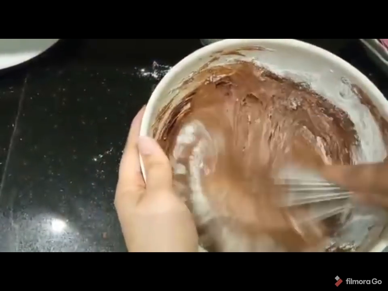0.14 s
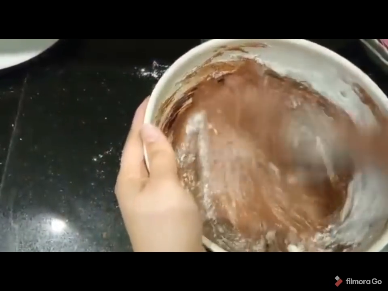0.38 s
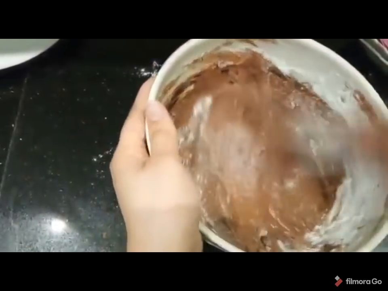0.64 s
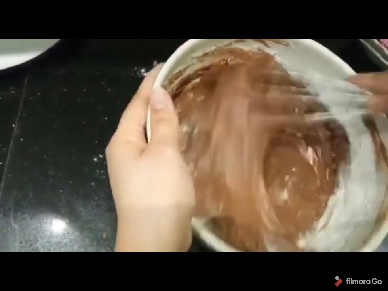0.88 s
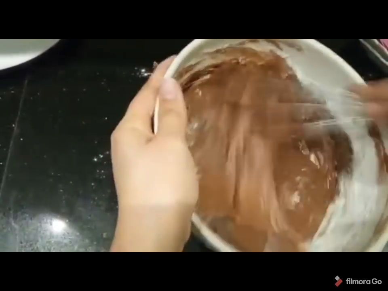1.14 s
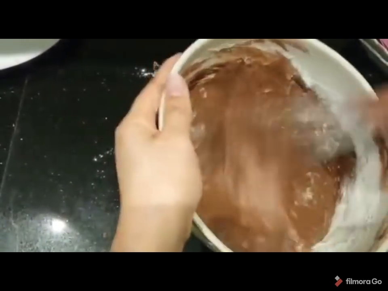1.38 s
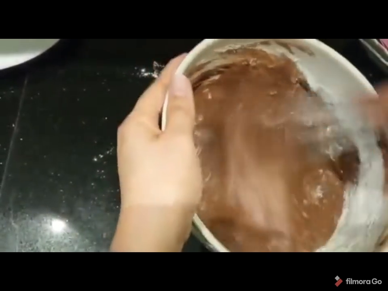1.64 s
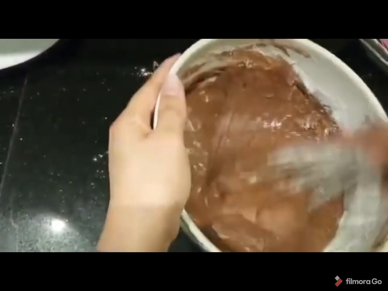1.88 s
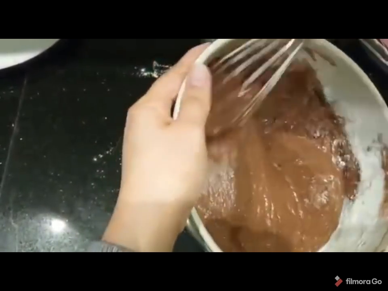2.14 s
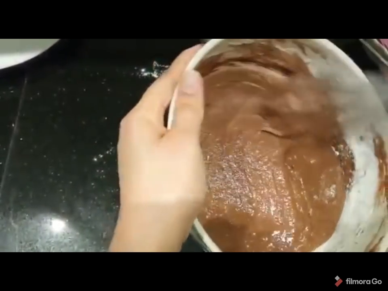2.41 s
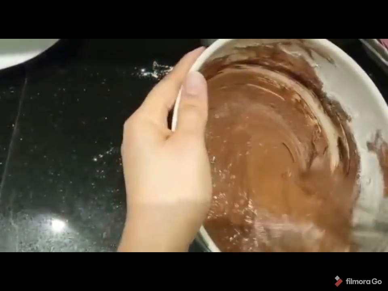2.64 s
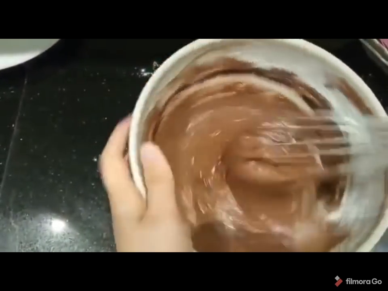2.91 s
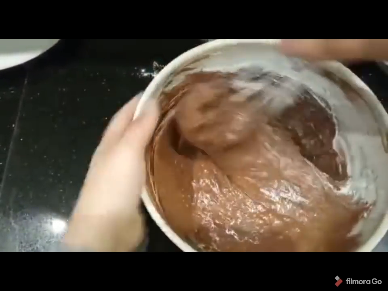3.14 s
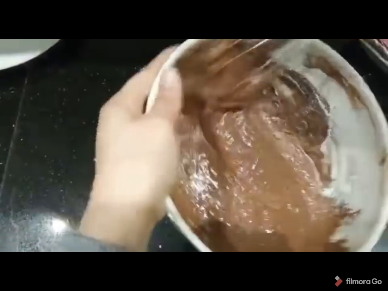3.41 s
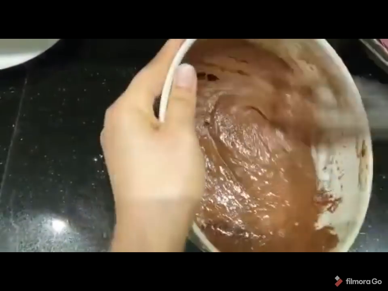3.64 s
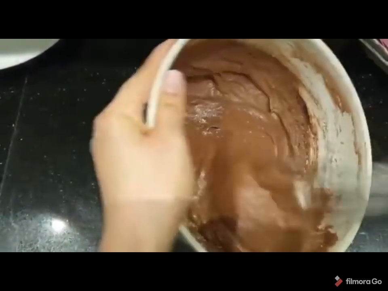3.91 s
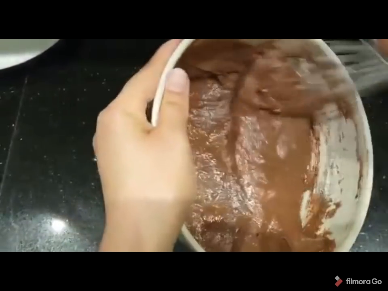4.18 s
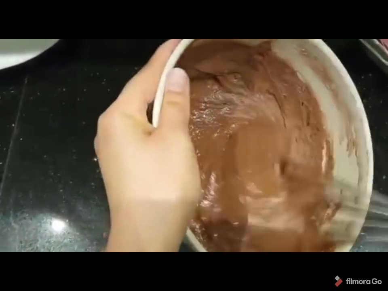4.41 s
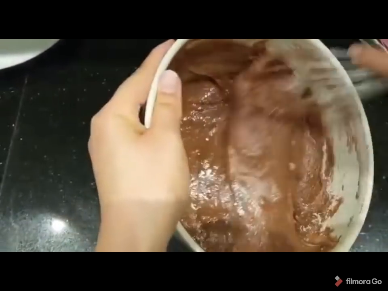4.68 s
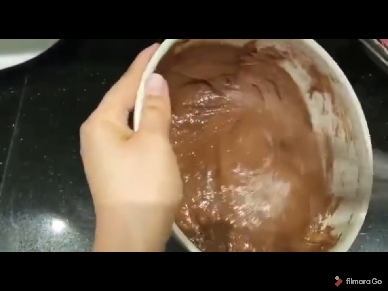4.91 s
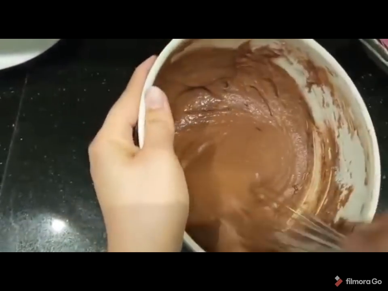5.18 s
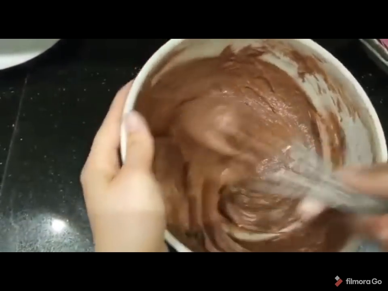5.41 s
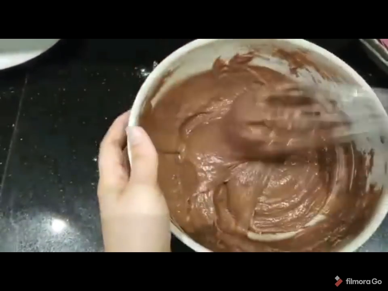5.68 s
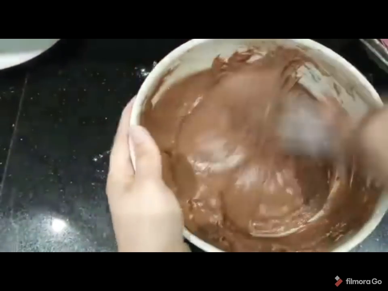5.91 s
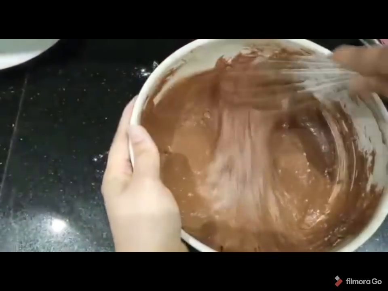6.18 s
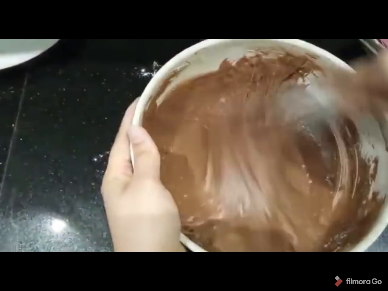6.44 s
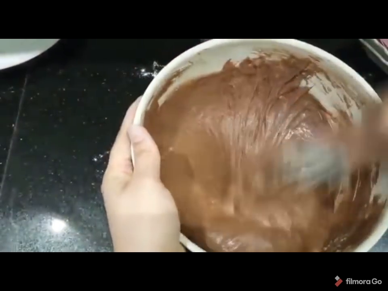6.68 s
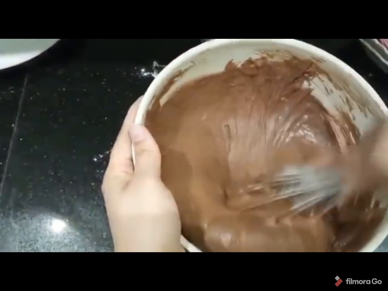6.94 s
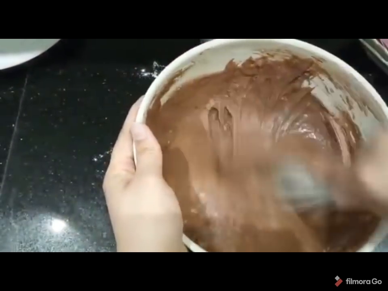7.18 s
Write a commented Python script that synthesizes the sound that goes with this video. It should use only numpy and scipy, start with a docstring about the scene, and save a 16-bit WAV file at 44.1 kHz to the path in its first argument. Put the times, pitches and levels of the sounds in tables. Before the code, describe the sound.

A phone close to the bowl catches steel wires tapping and dragging through batter, cushioned and irregular. After about two seconds the strokes stretch into bright rasping swirls, broken by hollow plastic clunks with low thuds on the stone worktop. Later the beating returns to quick taps and brief scrapes, with a short hard room echo over soft hiss.

```python
"""Wire ticks, raspy sweeps and hollow knocks: a whisk beats thick batter in a plastic bowl, close to a phone.
Wires hit, drag along and sweep round the wall as shaped friction noise; some squeak or ring free.
The bowl knocks as a bank of decaying modes, shuffles, and thuds low on a stone worktop.
A small hard kitchen answers with noise tails, over a patchy background noise and faint microphone hiss."""
import sys
import numpy as np
from scipy import signal
from scipy.fft import rfft, irfft, next_fast_len
from scipy.io import wavfile
from scipy.ndimage import uniform_filter1d, map_coordinates

SR = 44100
rng = np.random.default_rng(int(sys.argv[2]) if len(sys.argv) > 2 else 0)


def invert_db(x):
    """Field ratio 10**(x/20) for x, a level in decibels (scalar or array-like)."""
    u = np.asarray(x, float) / 20
    return 10 ** u


def waveform_to_disk(signal):
    """Save audio, clipped to [-1, 1], as 16-bit WAV at the path in sys.argv[1]."""
    frames = np.transpose(np.atleast_2d(signal))
    scaled = np.clip(frames, -1, 1) * 32767
    samples = np.round(scaled).astype(np.int16)
    wavfile.write(sys.argv[1], SR, samples)


N = 322371  # length [samples]

# colour of steel through batter: (frequency [Hz], level [dB per Hz])
SLAP_COLOUR = [(88, -41.5), (150, -1), (383, -1), (674, -7.5), (1500, -3.5), (1650, -6.5), (2910, -6),
               (5440, -8.5), (7430, -10.5), (8190, -21.5), (9030, -9), (11900, -21), (15900, -19.5)]


def unit(x):
    """Scaled to rms 1."""
    return x / np.sqrt(np.mean(x ** 2) + 1e-20)


def along(points, hz):
    """(Hz, value) points read on a log frequency axis."""
    f, v = np.transpose(points)
    return np.interp(np.log(hz + 1), np.log(f + 1), v)


def wobble(rate):
    """A smooth random curve, rate knots a second."""
    knots = rng.standard_normal(int(N * rate / SR) + 4)
    return map_coordinates(knots, [np.arange(N) * rate / SR])


def filtered(x, response):
    """x times a response of frequency."""
    m = next_fast_len(x.shape[-1] + 8192)
    spectrum = rfft(x, m) * response(np.fft.rfftfreq(m, 1 / SR))
    return irfft(spectrum, m)[..., :x.shape[-1]]


def resonant(x, centre_hz, width_hz):
    """x through two equal resonances in a row, scaled to rms 1."""
    def response(hz):
        band = hz * width_hz
        return (band / (centre_hz ** 2 - hz ** 2 + 1j * band)) ** 2
    return unit(filtered(x, response))


def grit(spiky_db):
    """Dense friction grains: noise whose size jumps from catch to catch."""
    return unit(rng.standard_normal(N) * invert_db(spiky_db * wobble(600)))


def patchy(x, depth_db):
    """x with a random gain that differs from band to band and moment to moment, scaled to rms 1."""
    z = signal.stft(np.pad(x, (0, 512)), nperseg=512)[2]
    across_bands = uniform_filter1d(rng.standard_normal(z.shape), size=7, axis=0)
    patches = uniform_filter1d(across_bands, size=5, axis=1)
    return unit(signal.istft(z * invert_db(depth_db * unit(patches)), nperseg=512)[1][:N])


def halves(x, spectrum, split_hz):
    """x in a colour, parted into a dull and a bright half that add up to rms 1."""
    whole = unit(filtered(x, lambda hz: invert_db(along(spectrum, hz))))
    dull = filtered(whole, lambda hz: 1 / (1 + (hz / split_hz) ** 3))
    return dull, whole - dull


def knocks():
    """A blow is one short push; it rings the modes near its centre most, and each ring flutters at random."""
    # blows into the bowl: (time [s], level [dB], centre of the blow [Hz])
    hits = [(0.137, -25, 560), (0.2512, -37, 523), (0.3535, -37.5, 285), (0.428, -31.5, 905),
            (0.4406, -32, 490), (0.681, -46, 218), (0.7166, -35, 500), (0.9932, -32, 555),
            (1.0765, -36.5, 664), (1.118, -19, 463), (1.2056, -30.5, 256), (1.267, -48, 700),
            (1.3781, -36.5, 416), (1.5249, -33.5, 850), (1.778, -26.5, 870), (2.069, -52.5, 195),
            (2.6324, -26.5, 700), (2.7366, -32.5, 656), (3.0594, -6.5, 526), (3.1236, -9, 422),
            (3.1565, -7.5, 450), (3.173, -15.5, 604), (3.1833, -11, 484), (3.321, -21.5, 590),
            (3.5246, -36, 423), (3.629, -21.5, 287), (3.795, -25.5, 825), (3.9116, -34, 676),
            (4.028, -23.5, 240), (4.1323, -28.5, 260), (4.6103, -26.5, 256), (4.968, -38.5, 626),
            (5.232, -48.5, 305), (5.6203, -17.5, 510), (5.6274, -10.5, 504), (5.6402, -8, 607),
            (5.957, -25, 430), (6.2144, -30.5, 340), (6.3121, -25.5, 538), (6.6059, -41, 1060),
            (6.8215, -39, 350), (6.909, -27.5, 1160), (7.119, -36, 710), (7.1286, -34, 328),
            (7.211, -17.5, 493)]
    # modes of the plastic bowl: (frequency [Hz], level [dB], t60 [s])
    modes = [(133.6, 4, 0.46), (178.8, 4.5, 0.38), (278.7, -2.5, 0.38), (342.4, 1.5, 0.18),
             (414.7, -2.5, 0.26), (481, -9.5, 0.18), (555.5, -5.5, 0.17), (619, -0.5, 0.093),
             (728.4, -4.5, 0.15), (787, 4.5, 0.072), (850, -7.5, 0.15), (1046, -11.5, 0.061),
             (1141, -2.5, 0.12), (1347, -28, 0.23), (1550, -3.5, 0.024), (1750, -10, 0.13)]
    out, t = np.zeros(N + SR), np.arange(SR * 2 // 5) / SR
    hz, level_db, t60 = np.transpose(modes)[..., None]
    # 40 overlapping triangles join random values into a curve
    knots = np.clip(1 - abs(t / t[-1] * 39 - np.arange(40)[:, None]), 0, 1)
    # the bowl rocks back once after each blow, about 13 ms later, softer and duller
    late = rng.standard_normal((len(hits), 2))
    rebounds = [(s + 0.013 * (1 + 0.2 * a), db - 14.5 + 3 * b, centre_hz * 0.68)
                for (s, db, centre_hz), (a, b) in zip(hits, late)]
    blows = hits + rebounds
    chance = rng.standard_normal((len(blows), len(modes), 2 + len(knots)))
    for (s, db, centre_hz), draw in zip(blows, chance):
        # a light blow is cushioned by batter: weak first contact, slow swell (0 to 2/3)
        cushion = 1 / (1.5 + np.exp((db + 34.5) / 3))
        near_db = -5 * np.log2(hz / centre_hz) ** 2 + 1.1 * draw[:, :1]
        flutter = 1 + 1.14 * draw[:, 2:] @ knots
        swing = np.sin(2 * np.pi * hz * t + 1.03 * draw[:, 1:2])
        ring = (flutter * invert_db(level_db + near_db - 60 * t / t60) * swing).sum(0)
        ring *= 1 - np.exp(-t / (0.00079 + 0.004 * cushion))
        ring *= 1 + 0.85 * np.exp(-t / 0.013)  # the hand damps the first swing fast
        push_hz = centre_hz + 120  # the first contact is harder than the ring that follows
        cycles = t * push_hz
        push = 15 * np.sin(2 * np.pi * cycles) * cycles ** 2 * np.exp(-cycles / 0.3)
        start = round((s - 0.6 / push_hz) * SR)  # the push is strongest near s
        out[start:][:len(t)] += invert_db(db) * (invert_db(-7.5 * cushion) * push + invert_db(-20) * ring)
    return out[:N]


def ticks():
    """A wire tick is a short burst; a glancing one is brighter, a cushioned one loses its middle too."""
    # single wires meeting the wall: (time [s], level [dB], treble tilt [dB])
    taps = [(0.13, -43.5, -20), (0.138, -21.5, -9.5), (0.238, -36.5, -13), (0.428, -43, 9.5),
            (0.4349, -27, -12), (0.7084, -38.5, -8.5), (0.716, -42.5, 4.5), (0.795, -36.5, -6),
            (0.804, -38, -4), (0.9876, -30.5, 2.5), (1.084, -33.5, -21), (1.2594, -32, -11.5),
            (1.2665, -37, -9), (1.3762, -39, -14), (1.5261, -37.5, -7), (1.6058, -34.5, -18.5),
            (1.7357, -46, -6.5), (1.779, -29, -33.5), (1.784, -32, -3), (1.8784, -41, -6.5),
            (3.057, -15, -14), (3.125, -18, -11.5), (3.1471, -21.5, -11.5), (3.155, -26, -17),
            (3.1727, -14, -20.5), (3.3899, -38, 0.5), (3.7945, -33, -5.5), (4.028, -35, -20.5),
            (4.133, -41, -19.5), (4.6108, -37.5, -16.5), (5.6219, -20, -21), (5.628, -32, -7),
            (5.6401, -14.5, -13.5), (5.89, -38, -7), (5.8965, -30, -1.5), (6.2849, -29.5, -2.5),
            (6.3123, -21.5, -16), (6.5875, -44, 1.5), (6.6022, -39, -7.5), (6.67, -50, -11),
            (6.9066, -27.5, -7.5), (6.9083, -37, -7), (7.192, -44.5, -5), (7.2109, -17.5, -16)]
    dull, bright = halves(grit(spiky_db=3), SLAP_COLOUR, split_hz=4500)
    deep = filtered(dull, lambda hz: 1 / (1 + (hz / 1900) ** 4))
    out, t = np.zeros(N), np.arange(SR // 40) / SR
    shape = (1 - np.exp(-t / 0.00035)) * (invert_db(-60 * t / 0.013) + 0.14 * invert_db(-60 * t / 0.073))
    shape /= shape.max()
    # a neighbouring wire follows each tick by 3.5 to 10.5 ms, softer
    late = rng.random((len(taps), 2))
    after = [(s + 0.007 * (0.5 + a), db - 19 + 8 * (b - 0.5), tilt_db)
             for (s, db, tilt_db), (a, b) in zip(taps, late)]
    for s, db, tilt_db in taps + after:
        start = round((s - 0.0008) * SR)
        at = slice(start, start + len(t))
        middle = invert_db(1.5 * min(tilt_db + 9, 0)) * (dull[at] - deep[at])
        out[at] += invert_db(db) * shape * (deep[at] + middle + invert_db(tilt_db) * bright[at])
    return out


def sweeps():
    """Steel rasps round the wall in uneven surges; the wires sing on and off as they catch."""
    # long sweeps, one list each, pressure of the wires heard as level: (time [s], level [dB])
    strokes = [
        [(2.17, -91), (2.2, -57), (2.285, -53), (2.305, -47), (2.506, -40.5), (2.63, -40), (2.76, -45.5),
         (2.838, -67), (2.95, -67.5)],
        [(3.385, -62), (3.5, -45.5), (3.66, -41), (3.918, -44.5), (4.02, -69)],
        [(4.195, -66), (4.286, -47), (4.406, -42.5), (4.508, -46), (4.6, -83)],
        [(4.8, -72), (4.896, -46.5), (4.98, -41.5), (5.15, -44.5), (5.336, -51.5), (5.444, -76.5), (5.5, -83)],
    ]
    # one value for each sweep: (treble tilt [dB])
    stroke_tilt_db = [-0.5, 1.5, 4, 1]
    # colour of steel on the wall, as the phone hears it: (frequency [Hz], level [dB per Hz])
    rasp_colour = [(180, -55), (300, -12.5), (418, -13.5), (537, -24), (799, -11), (1360, -9.5),
                   (1800, -12.5), (2640, -7.5), (3450, -0.5), (8050, -8), (9660, -5.5), (13500, -21.5),
                   (15100, -12), (15900, -7.5)]
    # resonances of the wires: (centre [Hz], width [Hz], relative level [dB])
    wire_modes = [(1790, 400, -6), (2313, 350, -7.5), (3410, 200, -8), (3860, 320, -0.5)]
    t = np.arange(N) / SR
    s, db = np.concatenate(strokes).T
    tilt_points = np.repeat(stroke_tilt_db, [len(rows) for rows in strokes])
    tilt_db = np.interp(t, s, tilt_points) + 2 * wobble(12)  # the treble wavers at random
    touch = sum((t > rows[0][0]) & (t < rows[-1][0]) for rows in strokes)
    contact = uniform_filter1d(touch * 1., size=400)
    dull, bright = halves(patchy(grit(spiky_db=2.5), depth_db=2.5), rasp_colour, split_hz=6000)
    catches = grit(spiky_db=0.0)
    sing = sum(invert_db(mode_db + 3.4 * wobble(25)) * resonant(catches, centre_hz, width_hz)
               for centre_hz, width_hz, mode_db in wire_modes)
    rasp = dull + invert_db(tilt_db) * bright + invert_db(-14.0) * sing
    surge_db = 1.2 * wobble(60) + 1.2 * wobble(15)
    return contact * invert_db(np.interp(t, s, db) + surge_db) * rasp


def drags():
    """The wires bite at once, rasp for a moment and slide off into the batter."""
    # short drags of the wires: (time [s], level [dB], time before the fade [s], treble tilt [dB])
    scrapes = [(0.024, -66.5, 0.057, -2.5), (0.229, -46, 0.015, -0.5), (0.413, -64, 0.013, -20),
               (0.57, -61, 0.056, -5), (0.705, -38, 0.0037, -2), (0.788, -50, 0.061, -1.5),
               (0.973, -44.5, 0.036, -23), (1.074, -51, 0.044, 3), (1.373, -64, 0.025, 10),
               (1.505, -47.5, 0.018, -2.5), (1.605, -50, 0.039, 1.5), (1.77, -45, 0.02, -7.5),
               (1.866, -54, 0.048, 3.5), (2.044, -64.5, 0.084, -8), (4.781, -66.5, 0.011, 10),
               (5.884, -51.5, 0.005, 1), (6.083, -62, 0.019, 4.5), (6.389, -57.5, 0.018, 8),
               (6.587, -50.5, 0.02, -3), (6.672, -58, 0.041, 6.5), (6.895, -49, 0.007, -5),
               (6.979, -52, 0.025, 4), (7.188, -55.5, 0.014, -5), (7.268, -53, 0.014, 8)]
    dull, bright = halves(grit(spiky_db=1.5), SLAP_COLOUR, split_hz=2550)
    t, out = np.arange(N) / SR, np.zeros(N)
    for s, db, length, tilt_db in scrapes:
        at = slice(round(s * SR), round((s + 0.25) * SR))
        age = t[at] - s
        stroke = np.clip(age / 0.005, 0, 1) * np.exp(-np.clip(age - length, 0, None) / 0.022)
        out[at] += invert_db(db) * stroke * (dull[at] + invert_db(tilt_db) * bright[at])
    return out * invert_db(2.5 * wobble(70))


def squeaks():
    """A wire sticks and slips on the wet wall: a rough, flickering tone that starts quickly and fades."""
    # rough squeaks: (time [s], length [s], level [dB], centre [Hz], width [Hz])
    slips = [(0.03, 0.065, -67, 950, 200), (0.6, 0.053, -61, 1980, 700), (2.026, 0.08, -73, 1680, 250),
             (2.28, 0.19, -53.5, 1790, 171)]
    t, out = np.arange(N) / SR, np.zeros(N)
    for s, length, db, centre_hz, width_hz in slips:
        tone = resonant(grit(spiky_db=0), centre_hz, width_hz)
        shape = np.clip(np.minimum((t - s) / 0.0075, (s + length - t) / 0.03), 0, 1)
        out += invert_db(db + 2.7 * wobble(29.53)) * shape * tone
    return out


def pings():
    """A freed wire rings briefly at one pitch."""
    # a wire springs free: (time [s], level [dB], pitch [Hz])
    releases = [(2.6, -36, 1790), (2.496, -32, 3410), (4.2, -59, 3730)]
    out, t = np.zeros(N), np.arange(SR // 10) / SR
    shape = invert_db(-60 * t / 0.046) * (1 - np.exp(-t / 0.0008))
    for s, db, hz in releases:
        out[round(s * SR):][:len(t)] += invert_db(db) * shape * np.sin(2 * np.pi * hz * t)
    return out


def thuds():
    """The stone answers the bowl's foot with one low note that swells and dies."""
    # the foot meets the worktop: (time [s], level [dB])
    bumps = [(0.137, -44.5), (0.2512, -45.5), (0.429, -49), (0.7168, -54), (0.979, -53), (1.2057, -49),
             (1.779, -59), (2.632, -53.5), (2.735, -54), (3.0588, -27.5), (3.156, -25), (3.321, -38.5),
             (3.629, -32), (3.795, -48.5), (4.027, -46), (4.1321, -40), (4.6108, -35.5), (5.6277, -24.5),
             (5.9573, -47.5), (6.221, -40), (6.3126, -35.5), (6.8423, -46.5), (6.909, -55), (7.128, -45.5),
             (7.21, -36)]
    # note of the worktop: (frequency [Hz], t60 [s])
    stone_hz, stone_t60 = (105, 0.31)
    out, t = np.zeros(N + SR), np.arange(SR * 2 // 5) / SR
    boom = invert_db(-60 * t / stone_t60) * np.sin(2 * np.pi * stone_hz * t) * (1 - np.exp(-t / 0.017))
    for s, db in bumps:
        out[round(s * SR):][:len(t)] += invert_db(db) * boom
    return out[:N]


def shuffles():
    """The foot rubs and chatters on the stone, a low murmur of friction noise."""
    # the bowl shifts on the worktop: (time [s], length [s], level [dB])
    shifts = [(5.47, 0.21, -65.5), (1.135, .2, -55.5), (3.019, .05, -55.5), (3.071, 0.077, -32),
              (5.642, 0.082, -35.5), (6.83, 0.046, -58)]
    # colour of the rub: (frequency [Hz], level [dB per Hz])
    rub_colour = [(150, -27.5), (260, -3.5), (380, 0), (700, -5.5), (1000, -18.5), (2500, -29.5),
                  (6000, -45)]
    t = np.arange(N) / SR
    stroke = sum(invert_db(db) * np.clip(np.minimum(t - s, s + length - t) / 0.023, 0, 1)
                 for s, length, db in shifts)
    chatter = invert_db(3.8 * wobble(60))
    rub = unit(filtered(grit(spiky_db=1.5), lambda hz: invert_db(along(rub_colour, hz))))
    return stroke * chatter * rub


def kitchen(x):
    """Each frequency of the room's answer dies at its own speed; a new random tail is drawn every 0.2 s."""
    # decay of the room: (frequency [Hz], t60 [s])
    decay = [(100, 0.49), (500, 0.55), (1500, 0.44), (4000, 0.59), (10000, 0.5)]
    out, step = np.zeros(N + 2 * SR), SR // 5
    for at in range(0, N, step):
        hz, t, z = signal.stft(rng.standard_normal(SR // 2), SR, nperseg=256)
        tail = signal.istft(z * invert_db(-60 * t / along(decay, hz)[:, None]), SR, nperseg=256)[1]
        wet = signal.fftconvolve(x[at:at + step], tail / np.linalg.norm(tail))
        out[at + 180:][:len(wet)] += wet  # the answer comes 4 ms late
    return out[:N]


def hush():
    """Patchy background noise that rises and falls slowly, over the faint hiss of the microphone."""
    # background noise, rising and falling slowly: (time [s], level [dB])
    background_level = [(0, -69), (1.2, -64), (2.151, -67.5), (4.751, -69), (5.551, -68.5), (6.301, -72.5),
                        (7.31, -72)]
    # colour of the background: (frequency [Hz], level [dB per Hz])
    hush_colour = [(15, -52.5), (25, -23.5), (105, 3), (223, -7.5), (362, -3.5), (675, -11), (793, -8),
                   (4350, -12), (7880, -14), (9520, -7), (12500, -32), (15900, -21.5)]
    s, db = np.transpose(background_level)
    level_db = np.interp(np.arange(N) / SR, s, db)
    background = invert_db(level_db) * patchy(rng.standard_normal(N), depth_db=3.5)
    hiss = invert_db(-78.0) * rng.standard_normal(N)
    return filtered(background + hiss, lambda hz: unit(invert_db(along(hush_colour, hz))))


def scene():
    """Bowl and whisk, their room and the quiet background, mixed to one channel."""
    bowl = knocks() + thuds() + shuffles()
    wire = ticks() + pings()
    rub = sweeps() + drags() + squeaks()
    wet = kitchen(invert_db(-9.5) * bowl + invert_db(-7) * wire + invert_db(-8) * rub)
    return (bowl + wire + rub + wet + hush())[None]


def suppressed(x, floor_db, depth_db):
    """The phone's noise suppressor turns down each band while it is near the floor."""
    z = signal.stft(np.pad(x, ((0, 0), (0, 512))), nperseg=512)[2]
    across_bands = uniform_filter1d(abs(z) ** 2, size=5, axis=1)
    power = abs(uniform_filter1d(across_bands, size=3, axis=2))
    open_share = power / (power + invert_db(2 * floor_db))
    return signal.istft(z * invert_db(-depth_db * (1 - open_share)), nperseg=512)[1][:, :N]


def roll_off(x):
    """The treble ends steeply here."""
    return signal.sosfilt(signal.butter(12, 16650, fs=SR, output="sos"), x)


def record(dry):
    """The phone cuts the deep bass, ducks its noise floor and keeps nothing above its band limit."""
    low_cut = signal.butter(2, 90, "high", fs=SR, output="sos")
    heard = suppressed(signal.sosfilt(low_cut, dry), floor_db=-88.5, depth_db=10.5)
    mix = filtered(heard, lambda hz: hz < 15800)
    return roll_off(mix)


dry = scene()
out = record(dry)
waveform_to_disk(out)
```